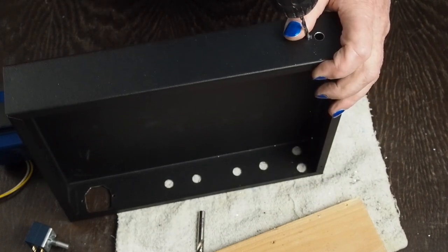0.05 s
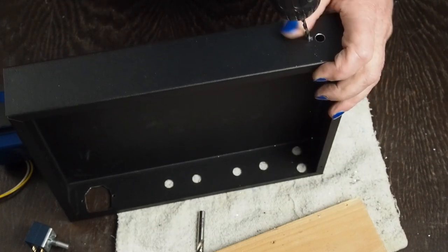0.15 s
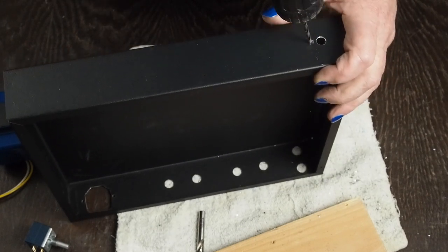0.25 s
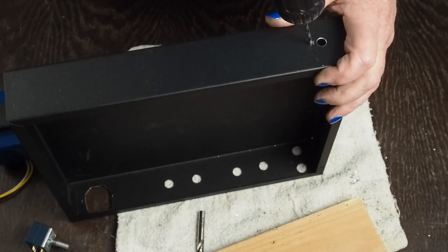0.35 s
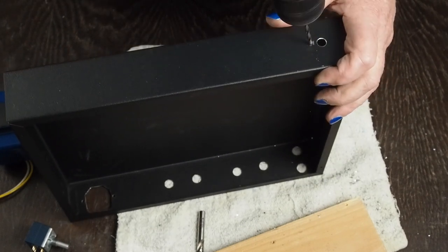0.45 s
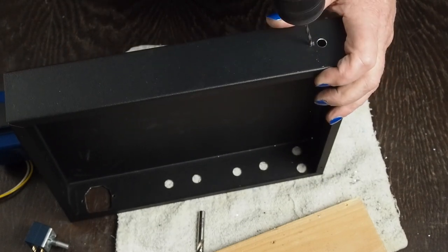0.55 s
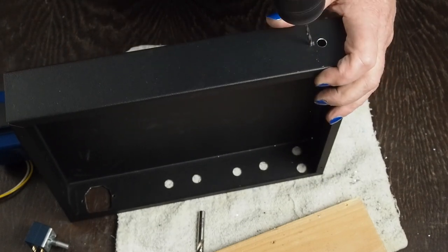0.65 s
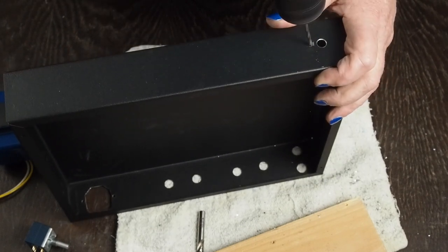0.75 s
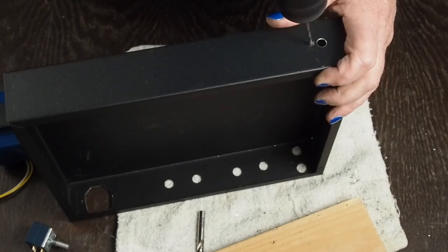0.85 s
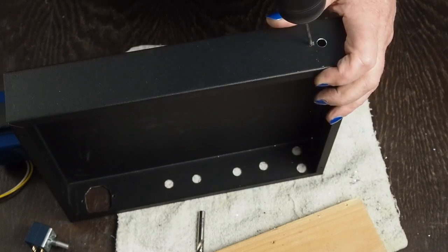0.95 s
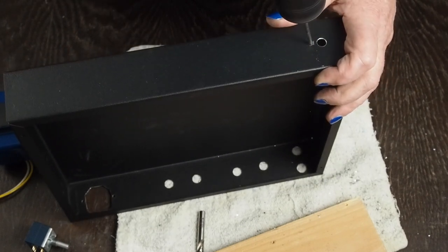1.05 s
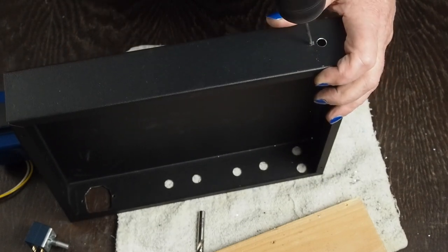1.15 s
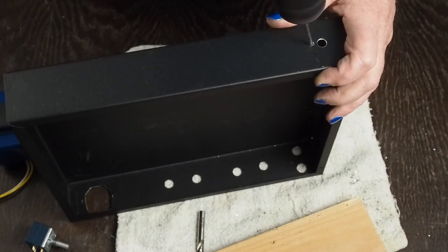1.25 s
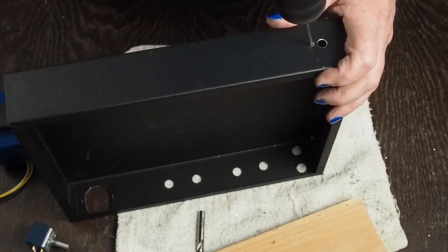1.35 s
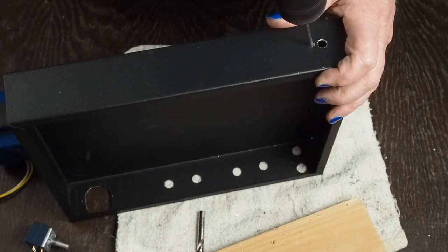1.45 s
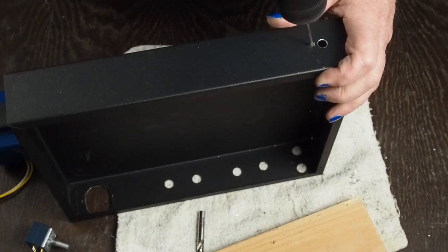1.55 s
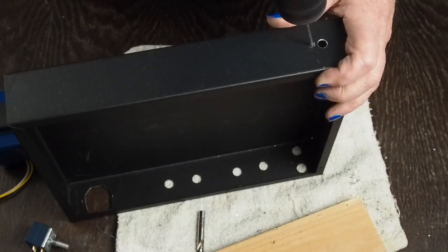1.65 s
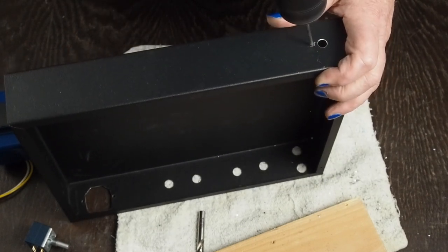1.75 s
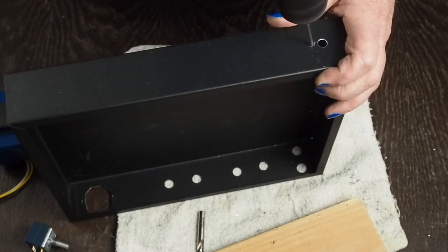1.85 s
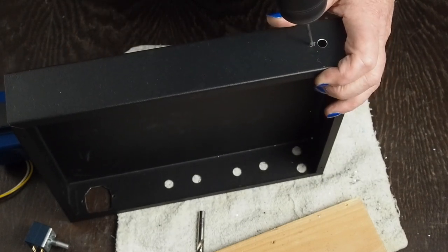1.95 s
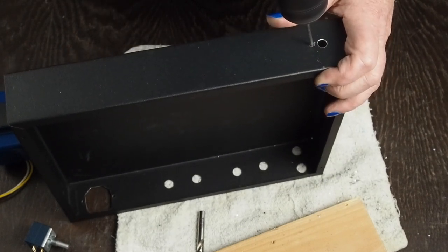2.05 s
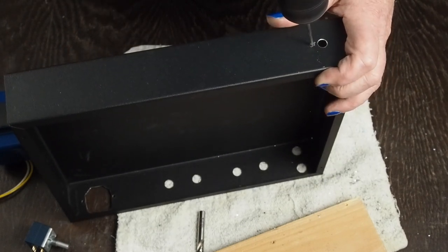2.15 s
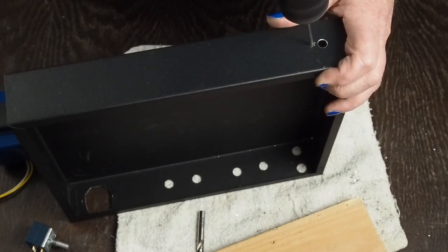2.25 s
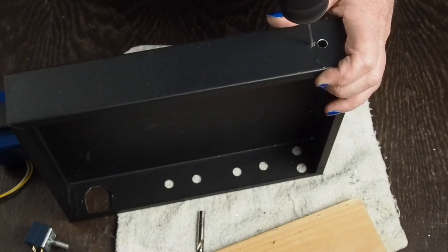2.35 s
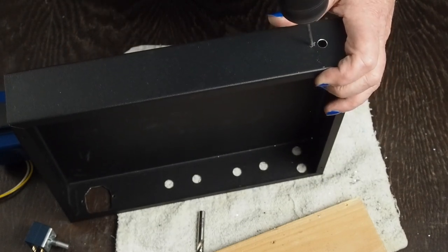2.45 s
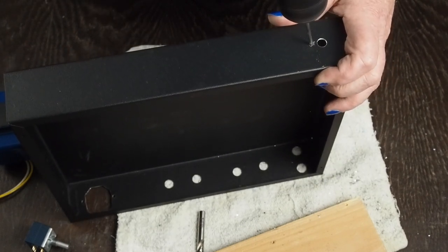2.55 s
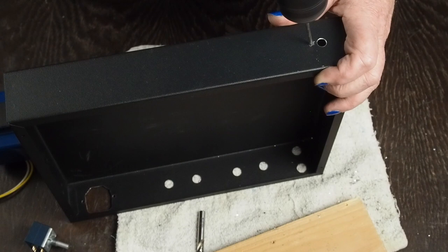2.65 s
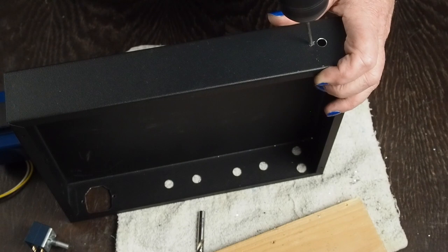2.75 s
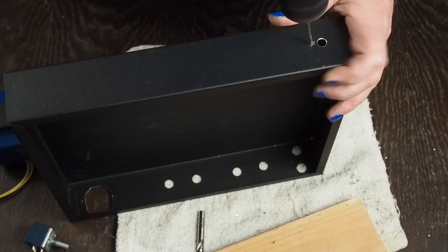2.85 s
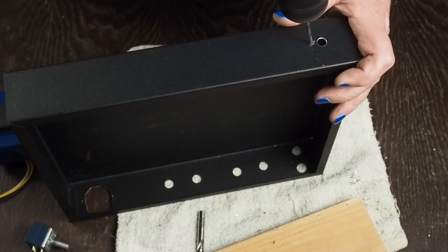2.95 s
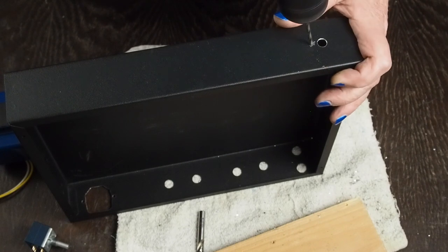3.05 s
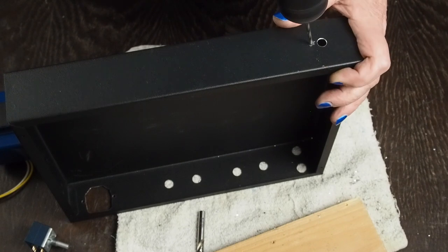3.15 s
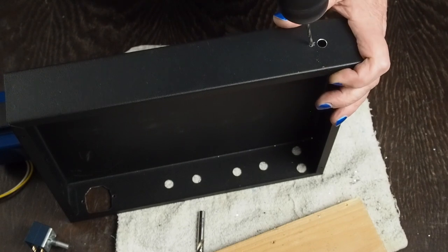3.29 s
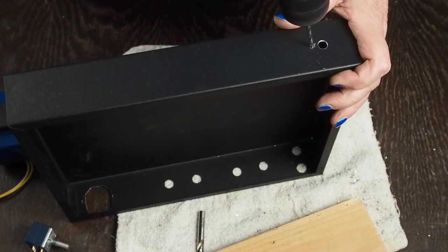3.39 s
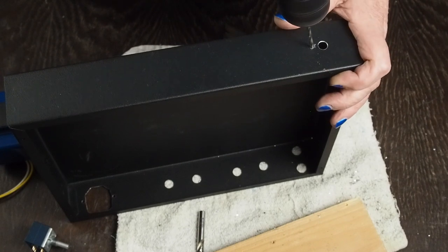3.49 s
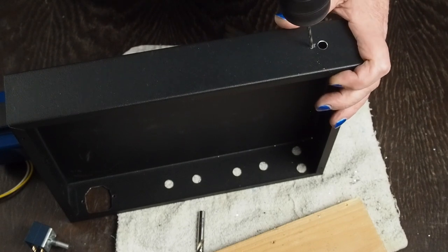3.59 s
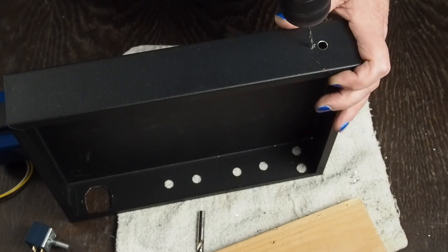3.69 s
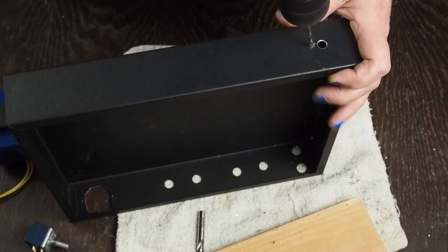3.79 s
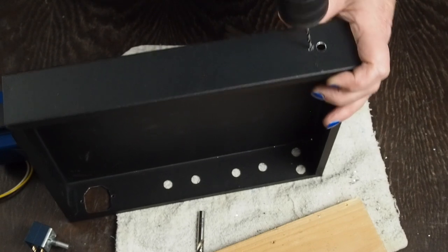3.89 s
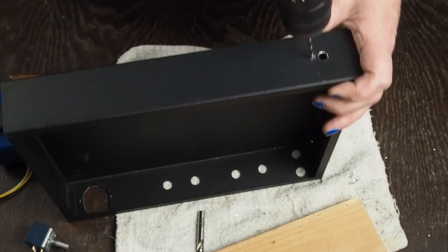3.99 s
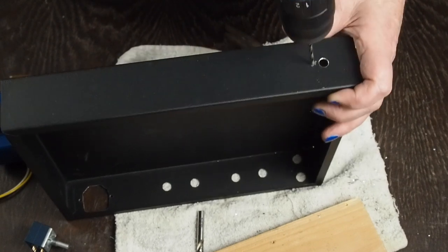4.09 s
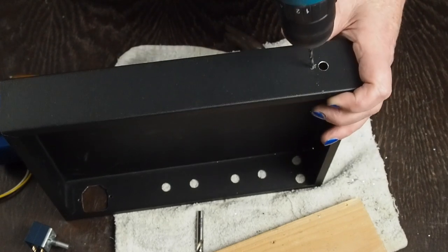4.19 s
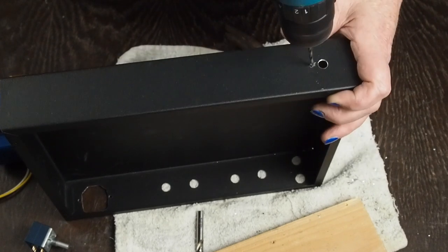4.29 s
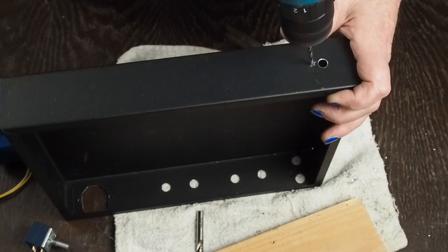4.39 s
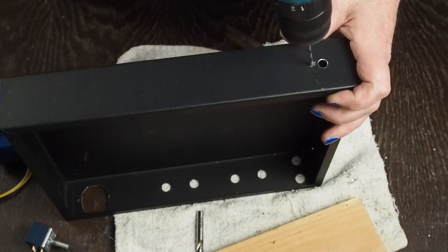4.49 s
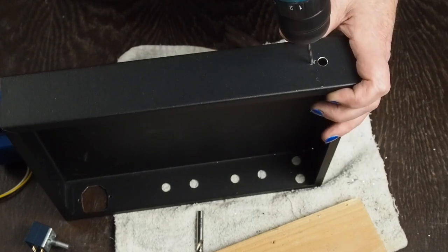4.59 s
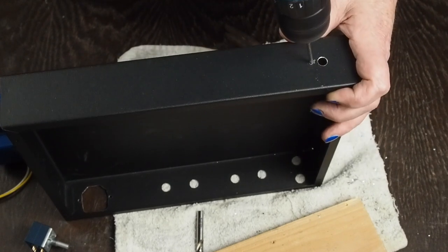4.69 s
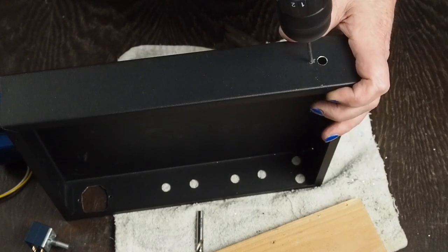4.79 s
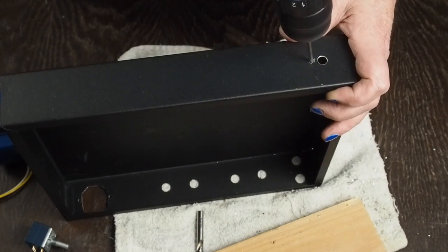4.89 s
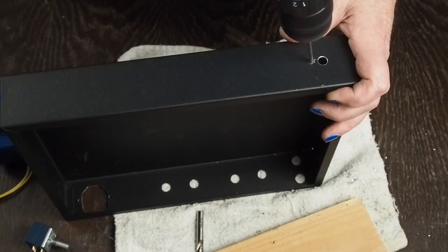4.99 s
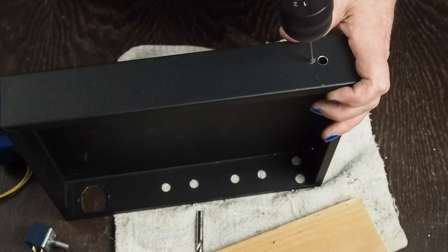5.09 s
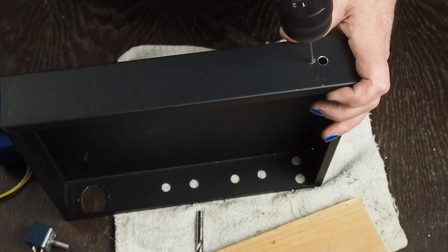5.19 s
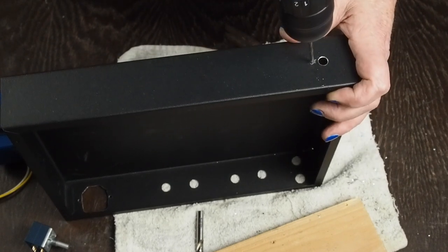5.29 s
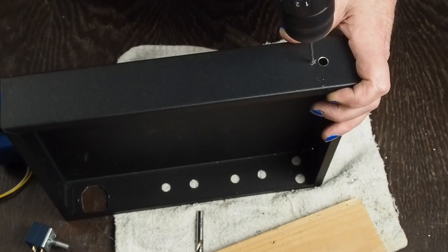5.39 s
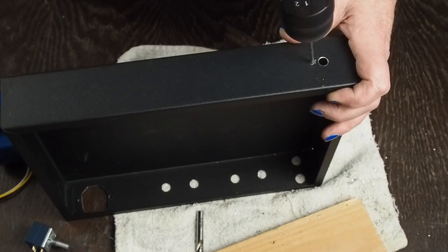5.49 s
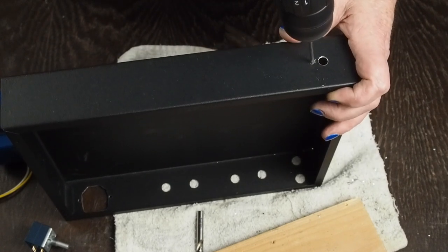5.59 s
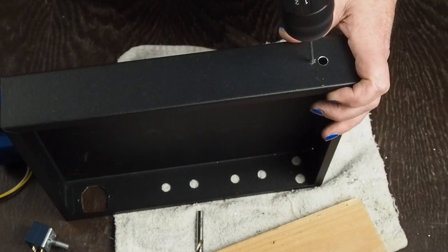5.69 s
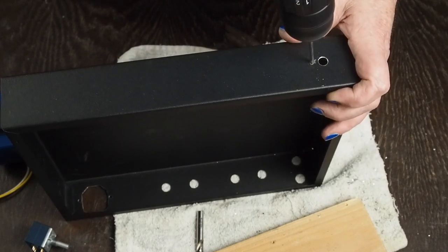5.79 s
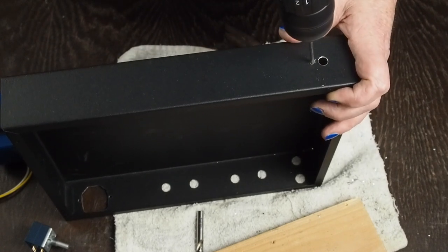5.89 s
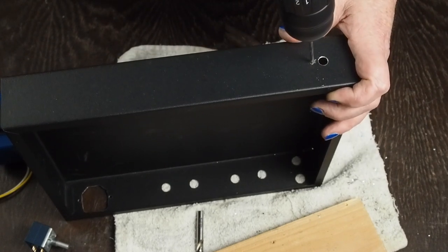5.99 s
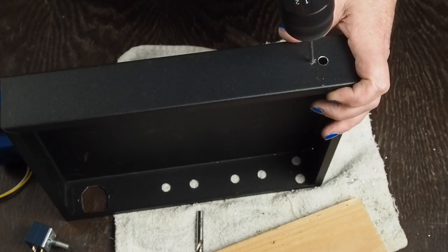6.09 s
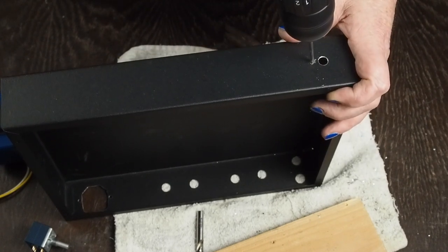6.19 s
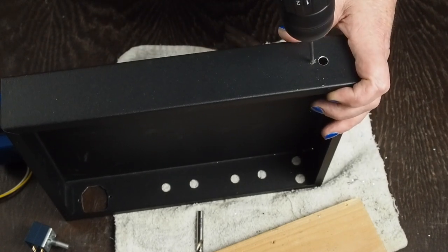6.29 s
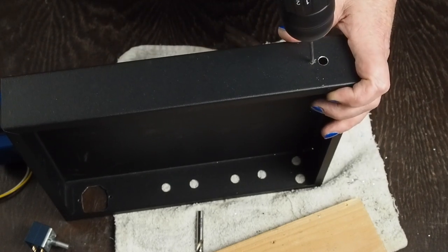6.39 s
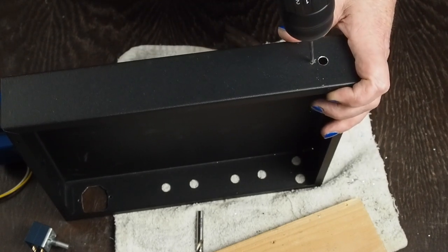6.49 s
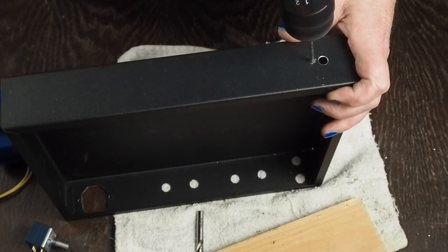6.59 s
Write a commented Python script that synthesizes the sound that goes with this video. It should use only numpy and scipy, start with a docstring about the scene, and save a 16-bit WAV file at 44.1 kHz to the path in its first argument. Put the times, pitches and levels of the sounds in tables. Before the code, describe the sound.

A handheld drill works on a hollow metal box on a bench, recorded close and dry with short metallic reflections. Light rubbing comes first, then a rapid knock of slack gears and a stuttering motor buzz. The whine rises and holds bright and gritty, glides down through ringing gear tones to a slow growl, then revs up again and drills on under growing load.

```python
"""A cordless drill bores into a steel chassis on a bench, close to one microphone.
The trigger chops the motor into a buzzing crawl, opens to a full whine, eases off, then opens again.
Tones locked to the shaft angle make the whine; grainy noise makes the rush of brushes and teeth.
The motor sags as the bit bites; low turbulent noise buffets the microphone.
The resting bit first rubs and squeaks on the steel, then the slack gears knock."""
import sys
import numpy as np
from scipy import signal
from scipy.fft import rfft, irfft
from scipy.io import wavfile
from scipy.ndimage import uniform_filter1d

SR = 44100
rng = np.random.default_rng(int(sys.argv[2]) if len(sys.argv) > 2 else 0)


def to_wav(sig):
    """Store sig (one row per channel, or 1-D mono) as 16-bit WAV at the path in sys.argv[1].

    Samples outside -1..1 are clipped; the rate is SR.
    """
    pcm = np.clip(np.atleast_2d(sig), -1, 1) * 32767
    pcm = np.round(pcm).astype(np.int16)
    wavfile.write(sys.argv[1], SR, pcm.T)  # frames by channels


N = 292824
TIME = np.arange(N) / SR
FULL_HZ = 285.6  # reference full speed, turns per second


def amp(db):
    """Level law: converts decibels to an amplitude gain."""
    return 10 ** (np.asarray(db) / 20)


def unit(x):
    """Power normalisation: scales a signal to rms 1."""
    return x / np.sqrt(np.mean(x ** 2) + 1e-20)


def colour(x, points):
    """Spectral shaping: filters by (Hz, dB) points joined along log frequency, then scales to rms 1."""
    hz, db = np.transpose(points)
    log_hz = np.log(np.fft.rfftfreq(N, 1 / SR) + 1)
    gain = amp(np.interp(log_hz, np.log(hz), db))
    return unit(irfft(rfft(x) * gain, N))


def wander(hz):
    """Low-passed randomness: slow chance of rms 1, up to about the given rate."""
    steps = rng.standard_normal(4096)
    rates = np.fft.rfftfreq(4096, TIME[-1] / 4096)
    smooth = irfft(rfft(steps) / (1 + (rates / hz) ** 2))
    return unit(np.interp(TIME, np.linspace(0, TIME[-1], len(steps)), smooth))


def add(mix, s, sound):
    """Superposition: lays a sound into the mix at time s."""
    part = mix[round(s * SR):][:len(sound)]
    part += sound[:len(part)]


def swell(start, end, rise_s, fall_s):
    """Gaussian envelope: rounded attack, hold from start to end, and release, 0-1."""
    before = np.minimum(TIME - start, 0) / rise_s
    after = np.maximum(TIME - end, 0) / fall_s
    return np.exp(-before ** 2 - after ** 2)


def swells(table):
    """Power addition: joint level of overlapping swells."""
    return np.sqrt(sum((amp(db) * swell(s, s, rise, fall)) ** 2 for s, rise, fall, db in table))


# Background spectrum of the quiet room. Each row: frequency in Hz, relative density in dB per Hz.
ROOM_SPECTRUM = [(30, -37), (100, -2), (300, -10), (600, 4), (2000, -1), (5000, -5), (15500, -10)]


def room(level_db=-68):
    """Ambient noise: a steady random floor of fixed spectrum."""
    return amp(level_db) * colour(rng.standard_normal(N), ROOM_SPECTRUM)


# Strokes of the bit over the steel. Each row: peak in seconds, rise in seconds, fall in seconds,
# level in dB.
SLIDES = [(.115, 0.05, .04, -54), (.22, 0.42, 0.21, -59.5)]
# Spectrum of the rubbing. Each row: frequency in Hz, relative density in dB per Hz.
SLIDE_SPECTRUM = [(40, -16), (170, -8), (300, -9), (820, -9), (935, 1), (1030, -7), (1350, -7), (1550, 0),
                  (1850, 2.5), (2150, -8), (3700, -16.5), (4400, -11), (5000, -20.5), (15000, -28)]


def slide(catch_db=1.0):
    """Sliding friction: the tip of the resting bit rubs unevenly over the chassis as coloured noise."""
    catching = amp(catch_db * wander(60))
    return swells(SLIDES) * catching * colour(rng.standard_normal(N), SLIDE_SPECTRUM)


# Faint arching squeaks. Each row: start in seconds, length in seconds, top pitch in Hz before wavering,
# rms level at the crest in dB.
SQUEAKS = [(.01, .37, 16000, -73), (4.32, .17, 14850, -61), (4.31, 0.19, 16200, -62)]
SQUEAK_ARCH = .17  # share by which the pitch is lower at both ends


def squeaks(waver_hz=60.0):
    """Frequency modulation: thin whistles that rise and fall, as of the bit slipping on paint."""
    out = np.zeros(N)
    for s, length, top_hz, db in SQUEAKS:
        u = np.linspace(-1, 1, round(length * SR))
        hz = top_hz * (1 - SQUEAK_ARCH * u ** 2) + waver_hz * wander(200)[:len(u)]
        level = amp(db) * np.sqrt(2 * (1 - u ** 2))
        add(out, s, level * np.sin(2 * np.pi * np.cumsum(hz) / SR))
    return out


# Knocks of the gear slack. Each row: time in seconds, peak level in dB.
KNOCKS = [(0.472, -38), (.478, -31.5), (0.484, -33), (0.498, -34), (0.506, -34), (0.532, -36)]
# Modes of the case. Each row: frequency in Hz, relative level in dB, time to decay by 60 dB in seconds.
CASE = [(590, -12, 0.042), (930, -16, 0.025), (1490, -8, 0.014), (2860, -3, 0.01), (4640, -10, 0.013),
        (6700, -14, .01)]


def knocks(crack=0.47):
    """Impact excitation: gear teeth take up their slack and ring the decaying modes of the case."""
    t, out = TIME[:3000], np.zeros(N)
    for s, db in KNOCKS:
        ring = np.zeros(len(t))
        for hz, level, t60 in CASE:
            ring += amp(level - 60 * t / t60) * np.sin(2 * np.pi * (hz * t + rng.random()))
        hit = ring + crack * rng.standard_normal(len(t)) * np.exp(-t / 0.0022)
        add(out, s, amp(db) * hit / abs(hit).max())
    return out


# The hand leans on the bit. Each row: start in seconds, added load as a share of full load,
# settling time constant in seconds.
LEANS = [(1.77, .168, .1), (5.01, .872, .58)]


def pressure():
    """Exponential settling: each lean of the hand builds up the load on the bit gradually."""
    load = np.zeros(N)
    for s, more, settle in LEANS:
        load += more * (1 - np.exp(-np.maximum(TIME - s, 0) / settle))
    return load


# Moves of the trigger finger. Each row: start in seconds, travel time in seconds,
# unloaded speed asked for in turns per second.
TRIGGER = [(.478, .003, 115.6), (.702, .063, 187.4), (.984, .125, 281.1), (2.595, .24, 194),
           (2.835, .33, 99.6), (3.557, .11, 88.6), (3.877, .01, 84.3), (4.472, .122, 116),
           (4.595, .149, 279)]
KICK_HZ, INERTIA_S = 70, .042  # speed asked for before the first move; time constant of the rotor's lag
SAG, WAVER = .0653, .0013  # shares of speed: lost under full load, rms wandering


def motor_speed(load):
    """First-order lag: the rotor follows the trigger with inertia, sags under load and wavers a little."""
    asked = np.full(N, float(KICK_HZ))
    for s, travel, hz in TRIGGER:
        asked += (hz - asked) * np.clip((TIME - s) / travel, 0, 1)
    keep = np.exp(-1 / (INERTIA_S * SR))
    lagged = signal.lfilter([1 - keep], [1, -keep], asked)
    return lagged * (1 - SAG * load + WAVER * wander(6))


STALL_HZ = 50.5  # the rush grows with the speed above this stall, turns per second
TOUCH_S, TOUCH_RISE_S, UNTOUCHED_DB = 0.708, 0.047, -5.5  # weaker until the bit seats on the steel
# At the slowest crawl the friction drops a little further.
CRAWL_HZ, CRAWL_SPAN_HZ, CRAWL_DB = 95.6, 15, -2


def rush_db(law, speed, load):
    """Power law: friction noise grows with speed and load, and rises quickly as the bit seats."""
    full_db, slope_db, load_db = law
    pace = np.maximum((speed - STALL_HZ) / (FULL_HZ - STALL_HZ), .02)
    crawl = np.clip((CRAWL_HZ - speed) / CRAWL_SPAN_HZ, 0, 1)
    unseated = np.clip(1 - (TIME - TOUCH_S) / TOUCH_RISE_S, 0, 1)
    driven_db = full_db + slope_db * np.log10(pace) + load_db * load
    return driven_db + CRAWL_DB * crawl + UNTOUCHED_DB * unseated


def bench(x, echo_db, t60):
    """Reverberation: adds dense short echoes from the steel box and the bench."""
    t = TIME[:4096]
    tail = rng.standard_normal(len(t)) * amp(-60 * t / t60) * (t > .001)
    tail = tail / np.linalg.norm(tail)
    return x + amp(echo_db) * signal.oaconvolve(x, tail)[:N]


# Level laws of the hiss and the rattle. Each holds: dB at full speed unloaded,
# dB per decade of speed above a stall, dB added by full load.
HISS_LAW = (-31, 22.04, 3.25)
RATTLE_LAW = (-39, 12.1, 4.26)
# Spectra of hiss and rattle at slow and fast turning. Each row: frequency in Hz,
# relative density in dB per Hz.
HISS_SLOW = [(2120, -18), (3600, -4), (4100, -12), (4530, 2.5), (4910, -4), (5420, -1.5), (5870, -4),
             (6600, -1), (7950, -6.5), (10300, -8), (11100, -13), (13700, -4), (15800, -9)]
HISS_FAST = [(2120, -33), (3600, -5.5), (3880, -19), (4230, -3), (4640, -1.5), (5190, -4), (5730, -3),
             (6520, -0.5), (7160, -2.5), (8670, -3.5), (11000, -4.5), (12000, -1), (13500, 1.5),
             (15100, -1), (15800, -15)]
RATTLE_SLOW = [(40, -46), (120, -18), (300, -17), (500, -8), (850, -7), (1200, -1), (1600, -3.5),
               (2150, 2.5), (2500, -2), (2800, 2.5), (3200, -9.5), (3800, -8), (4500, -11.5)]
RATTLE_FAST = [(30, -33), (60, -10), (95, -16), (135, -5), (180, -16.5), (220, -20), (290, -11), (400, -10),
               (650, -3.5), (950, -3.5), (1170, 6.5), (1500, -1.5), (2000, -2.5), (2400, 1), (2950, 4.5),
               (3400, -5.5), (3800, -4), (4500, -11)]


def rush(speed, angle, load, throb=0.17, grain=0.21, flicker_db=-0.94, slow_hz=92.0, fast_hz=211.0):
    """Modulated friction noise: brushes scrape and teeth rattle in tiny grains, pulsing with each turn."""
    fast = np.clip((speed - slow_hz) / (fast_hz - slow_hz), 0, 1)
    beat = 1 + throb * (np.cos(angle) + 0.41 * np.cos(3 * angle)) / 2
    hiss = (HISS_LAW, HISS_SLOW, HISS_FAST)
    rattle = (RATTLE_LAW, RATTLE_SLOW, RATTLE_FAST)
    out = np.zeros(N)
    for law, slow_colour, fast_colour in (hiss, rattle):
        clumps = unit(uniform_filter1d(rng.standard_normal(N), size=14))
        grains = rng.standard_normal(N) * np.exp(grain * clumps)
        scrape = bench(grains * beat * amp(flicker_db * wander(90)), echo_db=-7.5, t60=0.078)
        shaped = (1 - fast) * colour(scrape, slow_colour) + fast * colour(scrape, fast_colour)
        out += amp(rush_db(law, speed, load)) * shaped
    return out


# Spells of buzzing with the trigger half pressed. Each row: start in seconds, end in seconds,
# level in dB, unsteadiness in radians rms.
BUZZES = [(0.487, .66, -49.5, 0.45), (.71, 0.793, -47.5, 1.11), (0.835, 1.027, -52, 0.44),
          (3.23, 3.635, -52, .5), (3.71, 3.907, -52.5, 1.05), (3.973, 4.308, -52, .08),
          (4.392, 4.574, -52.5, 0.65), (4.645, 4.684, -49.5, 1.2)]
BUZZ_RISE_S, BUZZ_FALL_S = 0.033, 0.025


def buzzing():
    """Envelope following: level and unsteadiness of the trigger's buzz, from its spells."""
    spells = np.array([swell(start, end, BUZZ_RISE_S, BUZZ_FALL_S) for start, end, _, _ in BUZZES])
    _, _, db, unsteady = np.transpose(BUZZES)
    level = (amp(db)[:, None] * spells).max(axis=0)
    return level, unsteady @ spells / (spells.sum(axis=0) + 1e-9)


def chopping(full_db=-38.0):
    """Duty control: how far the trigger chops the current, 0-1; chopping breaks up the steady tones."""
    return np.clip(buzzing()[0] / amp(full_db), 0, 1) ** 2


# Tooth-mesh tones that excite the gearbox. Each row: multiple of the shaft speed,
# drive level in dB before the gain of the resonances.
MESHES = [(8.83, -36), (10.91, -39.5), (15, -47.5)]
# Resonances of the gearbox. Each row: frequency in Hz, half-width in Hz, gain in dB.
RING = [(2794, 74, 5), (2310, 51, -1.5), (2030, 52, -6.5)]


def gearbox_ring(speed, angle, flutter_db=0.5, blur=0.54, chopped_db=-6.5, full_hz=262.6):
    """Resonance: below full_hz, each tooth-mesh tone flares as it crosses a gearbox resonance."""
    out = np.zeros(N)
    for teeth, mesh_db in MESHES:
        nearness = sum(amp(db) / (1 + ((teeth * speed - hz) / width) ** 2) for hz, width, db in RING)
        coarse = teeth < 12  # the coarse stages need steady drive
        level_db = mesh_db + flutter_db * wander(40) + chopped_db * chopping() * coarse
        out += nearness * amp(level_db) * np.cos(teeth * angle + blur * wander(26))
    return out * np.clip((full_hz - speed) / 10, 0, 1)


# Modes of the drill's body. Each row: frequency in Hz, bandwidth in Hz, relative gain in dB.
HOUSING = [(307, 25, -12.5), (439, 7.6, -2), (629, 28, 2.5), (783, 36, 6.5), (908, 39, 9),
           (1160, 210, -9.5), (1780, 380, -38)]


def housing(x):
    """Modal response: the body of the drill rings in a few damped modes, scaled to rms 1."""
    out = np.zeros(N)
    for hz, width, db in HOUSING:
        b, a = signal.iirpeak(hz, hz / width, fs=SR)
        out += amp(db) * signal.lfilter(b, a, x)
    return unit(out)


CHOP_HZ = 143.7  # rate at which the trigger chops the current


def buzz(angle, chop_db=-2.0, jitter=0.4, smear=0.355):
    """Sidebands: chopped current kicks the rotor; beating with six-fold commutation adds a gliding stack."""
    level, shake = buzzing()
    chop = 2 * np.pi * CHOP_HZ * TIME
    kicks = sum(np.cos(k * chop - smear * k ** 2) for k in range(1, 16))
    commutation = 6 * angle + shake * wander(44)
    beats = sum(np.cos(commutation + k * chop - smear * k ** 2) for k in range(-2, 12))
    torque = (beats + amp(chop_db) * kicks) * (1 + jitter * wander(170))
    return level * housing(torque)


def partials(table, angle, load, play, flutter_db):
    """Additive synthesis: tones locked to the shaft; load shifts their weights and play blurs them."""
    out, slack = np.zeros(N), wander(36)
    for multiple, free_db, loaded_db in table:
        level = (1 - load) * amp(free_db) + load * amp(loaded_db)
        unsteady = min(multiple / 10, 1)  # the low orders are the cleanest
        phase = multiple * (angle + play * (slack + wander(51))) + rng.uniform(0, 2 * np.pi)
        flutter = amp(flutter_db * unsteady * wander(44))
        out += flutter * level * np.sqrt(2) * np.cos(phase)
    return out


# Tones of the motor shaft. Each row: multiple of the shaft speed, rms level in dB running free,
# rms level in dB under load, both at top speed before flutter and torque.
MOTOR = [(3.013, -44.5, -47), (4.11, -59, -59), (6.1, -65, -79), (9.92, -53, -78), (11.3, -71, -65),
         (12.02, -55, -50), (16.88, -67, -65), (17.68, -66, -46.5), (21.97, -50.5, -41),
         (24.16, -42.5, -42), (27.55, -47, -53), (28.17, -53, -71), (30.37, -45, -49), (29.2, -47, -74),
         (31.5, -46.5, -50), (34.6, -52, -67.5), (35.4, -47, -55.6), (37.9, -46, -43), (45.2, -41, -41),
         (43, -46, -61.8), (47.2, -53.5, -58), (51.3, -51.5, -71)]
# Tones of the planetary gears. Each row: multiple of the shaft speed, rms level in dB running free,
# rms level in dB under load, both at top speed before flutter.
GEARS = [(0.65, -62, -96), (6.65, -58.5, -51.5), (8.77, -50.5, -47.5), (10.62, -56, -42),
         (10.88, -53, -42.5), (11.05, -79, -35), (11.26, -50, -46), (13.02, -69, -50.5), (17.1, -54.5, -53),
         (17.35, -63, -69), (20.73, -82, -43.5), (22.45, -104, -42.5), (33.76, -52, -40.5)]
COAST_FLUTTER_DB = 2.5  # slack teeth make the tones come and go while the motor slows
DEAD_HZ, DEAD_WIDTH_HZ, DEAD_DB = 548, 28, -9  # the body hardly radiates the main whine at this pitch


def whine(speed, angle, load, low_fade_db=36.0, high_fade_db=93.0, gear_fade_db=44.0, surge_db=6.5,
          coast_db=-1.5, chopped_db=-3.0, silent_hz=120.0, sure_hz=153.0):
    """Order tones: shaft and gear tones grow with speed; surging torque swells the lowest, coasting thins."""
    slowness = np.log10(speed / speed.max())  # decades below top speed; fades are in dB per decade
    gain_rate = uniform_filter1d(np.gradient(speed), size=2000) * SR  # Hz per second
    surge = np.clip(gain_rate / 700, 0, 1)
    coast = np.clip(-gain_rate / 300, 0, 1)
    torque_db = surge_db * surge * (speed / FULL_HZ) ** 2
    torque_db = torque_db + coast * (coast_db + COAST_FLUTTER_DB * wander(25))
    main_hz = MOTOR[0][0] * speed
    dead_db = DEAD_DB * (1 - surge) / (1 + ((main_hz - DEAD_HZ) / DEAD_WIDTH_HZ) ** 2)
    low = partials(MOTOR[:3], angle, load, play=0.01, flutter_db=-0.5)
    low *= amp(low_fade_db * slowness + torque_db + dead_db)
    high = partials(MOTOR[3:], angle, load, play=0.018, flutter_db=1.0) * amp(high_fade_db * slowness)
    gears = partials(GEARS, angle, load, play=0.019, flutter_db=2.0)
    gears *= amp(gear_fade_db * slowness + coast * COAST_FLUTTER_DB * wander(23))
    spinning = np.clip((speed - silent_hz) / (sure_hz - silent_hz), 0, 1)  # no whine at a crawl
    return (low + high + gears) * amp(chopped_db * chopping()) * spinning


# Gusts on the microphone. Each row: peak in seconds, rise in seconds, fall in seconds,
# level in dB before a common trim.
GUSTS = [(.94, .08, .13, -36), (1.12, .09, .19, -35.7), (1.37, .14, .23, -38.3), (1.83, .02, .05, -56),
         (5.66, .06, .45, -53), (6.05, .04, .05, -52), (6.2, .02, .04, -45), (6.58, .17, .15, -49)]
# Spectrum of the moving air. Each row: frequency in Hz, relative density in dB per Hz.
AIR = [(20, -21), (50, -1.5), (100, 4), (160, 3), (300, -5), (450, -24), (800, -28), (1600, -39)]
# Spectrum of small eddies in the strongest gusts. Each row: frequency in Hz, relative density in dB per Hz.
EDDIES = [(60, -32), (200, -5), (350, 6), (600, -5), (900, -7.5), (2000, -51)]
FAN_AIR_DB = -76  # breeze of the cooling fan at full speed; its amplitude grows with the cube of the speed


def draught(speed, level_db=0.3, gust_db=2.0, eddy_db=-9.0, eddy_growth=1.0):
    """Turbulence: lumpy low pressure noise at the microphone, brighter in the strongest gusts."""
    pace = speed / FULL_HZ
    flow = amp(level_db) * swells(GUSTS) + amp(FAN_AIR_DB) * pace ** 3
    force = flow * unit(amp(gust_db * wander(60)))
    eddy_level = amp(eddy_db) * (force / amp(-40.5)) ** eddy_growth
    eddies = eddy_level * colour(rng.standard_normal(N), EDDIES)
    return force * (colour(rng.standard_normal(N), AIR) + eddies)


def scene(bite=1.15):
    """Superposition: the drill, the air and the quiet room, alike in both channels."""
    load = pressure()
    speed = motor_speed(load)
    angle = 2 * np.pi * np.cumsum(speed) / SR
    running = np.clip((TIME - .475) / 0.021, 0, 1)
    tone_load = np.clip(load, 0, 1) ** bite
    drill = rush(speed, angle, load) + gearbox_ring(speed, angle) + buzz(angle)
    drill = drill + whine(speed, angle, tone_load)
    mono = room() + slide() + squeaks() + knocks() + running * (drill + draught(speed))
    return np.array([mono, mono])


EDGE_HZ = 15850  # upper edge of the band


def record(dry):
    """Band limiting: a symmetric low-pass removes what lies above the edge."""
    low_pass = signal.firwin(511, EDGE_HZ, window=("kaiser", 9), fs=SR)
    return signal.oaconvolve(dry, low_pass[None], "same")


dry = scene()
out = record(dry)
to_wav(out)
```